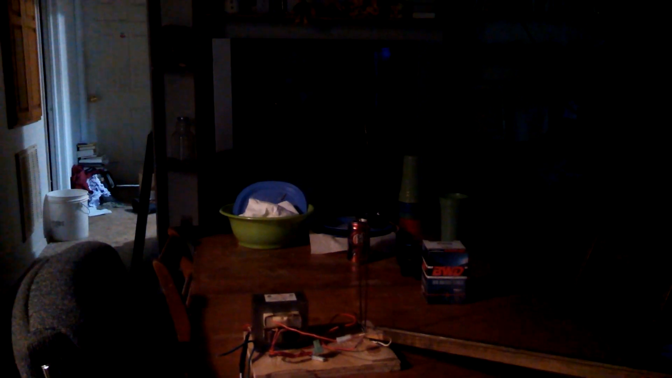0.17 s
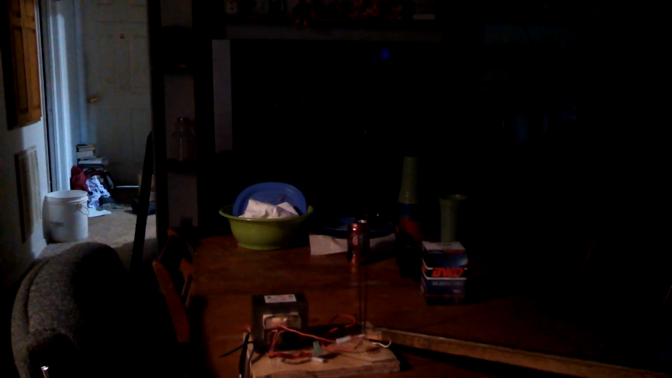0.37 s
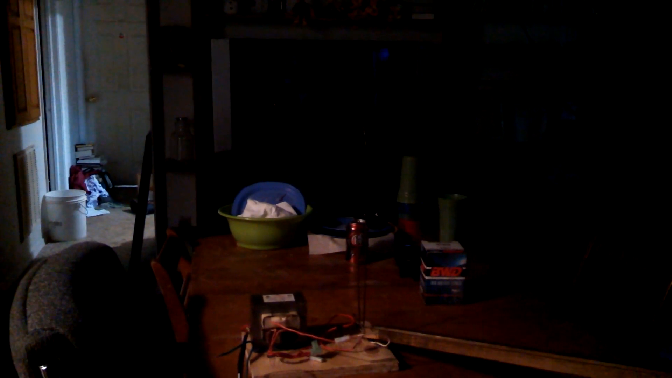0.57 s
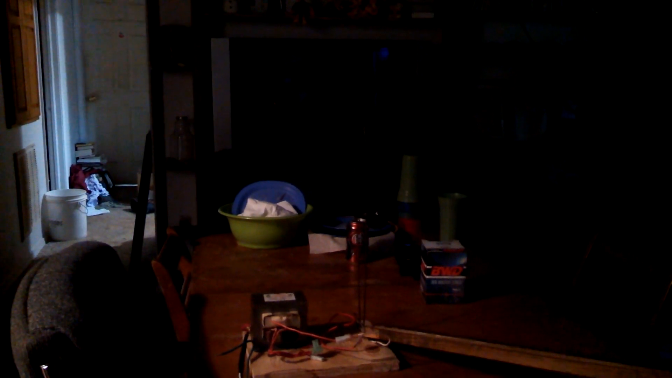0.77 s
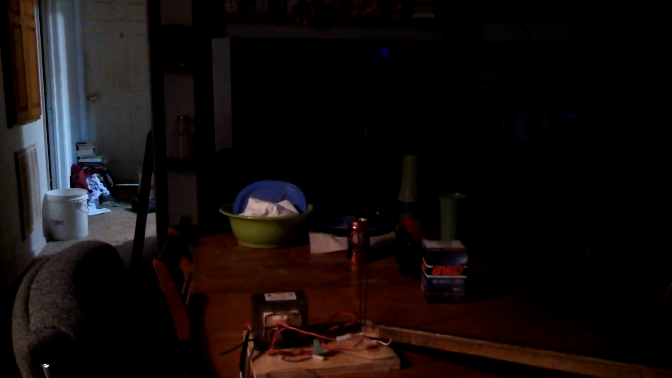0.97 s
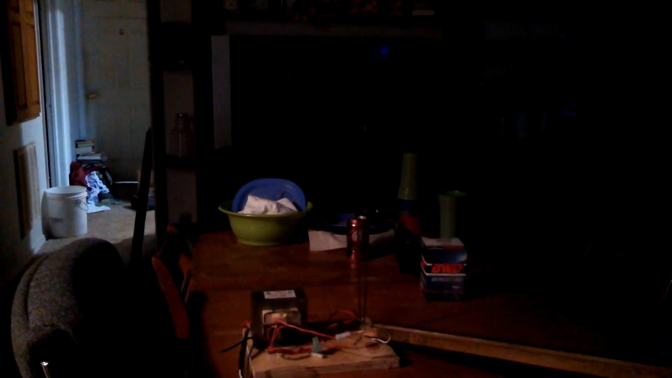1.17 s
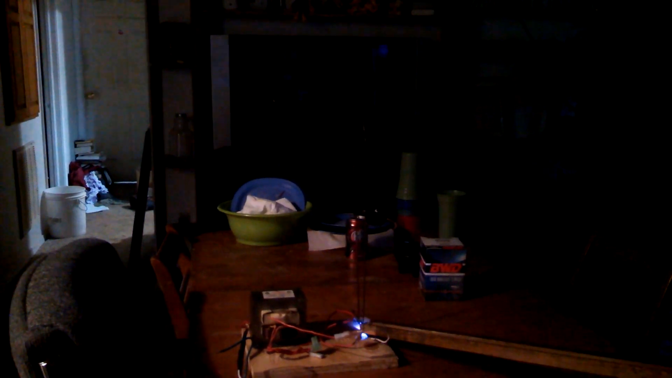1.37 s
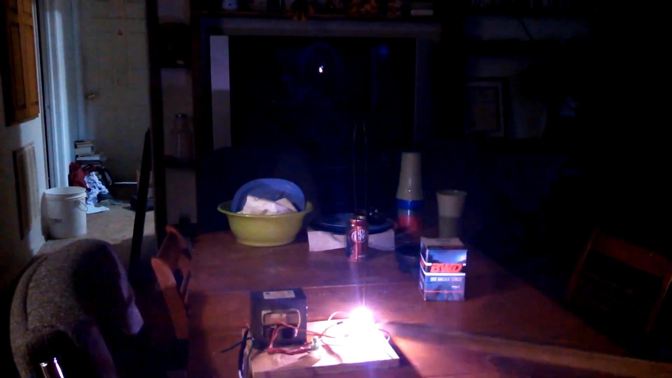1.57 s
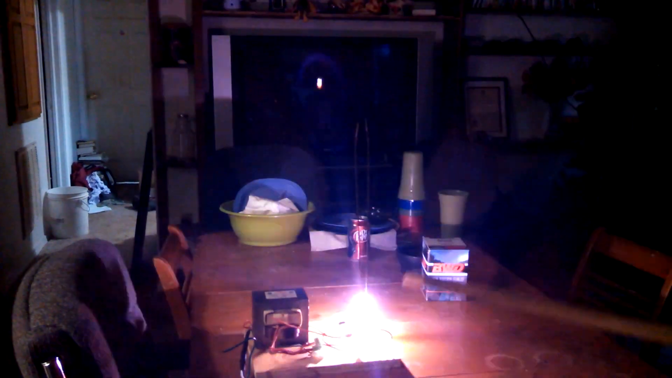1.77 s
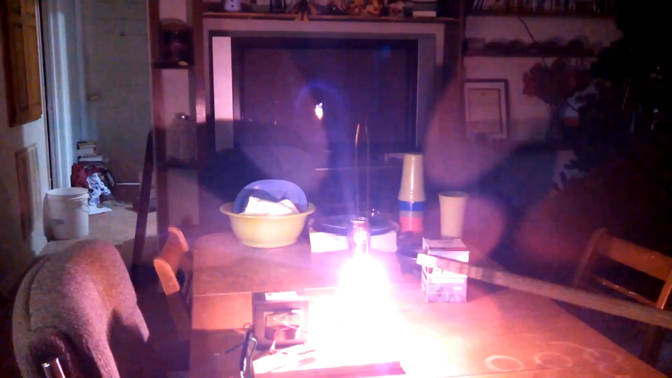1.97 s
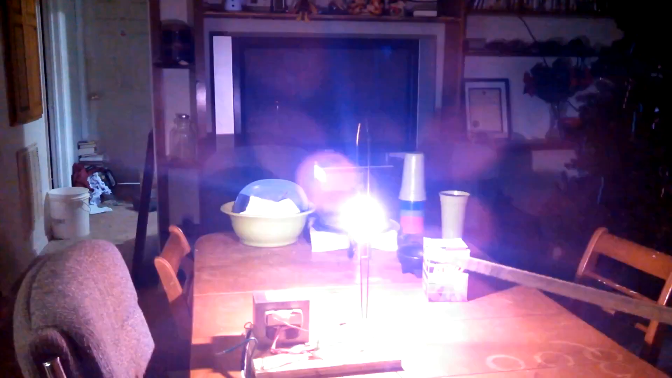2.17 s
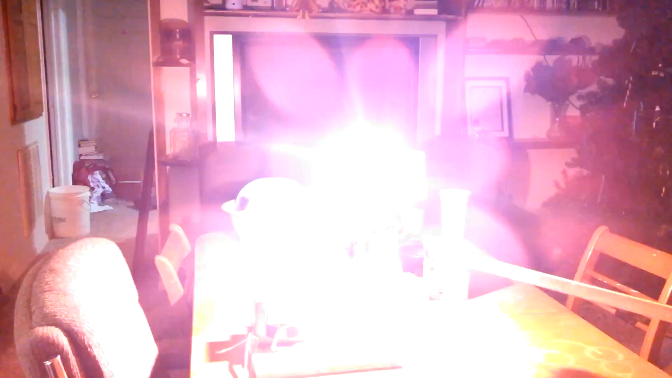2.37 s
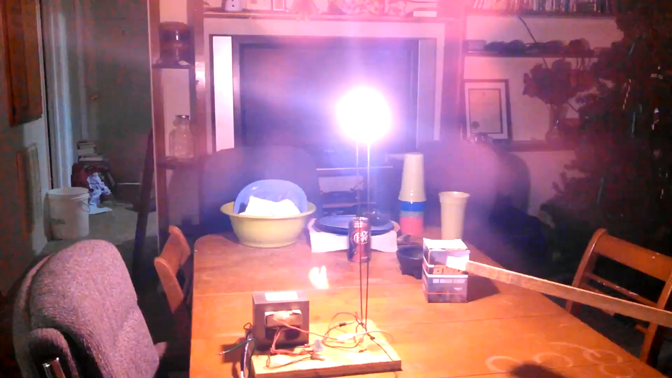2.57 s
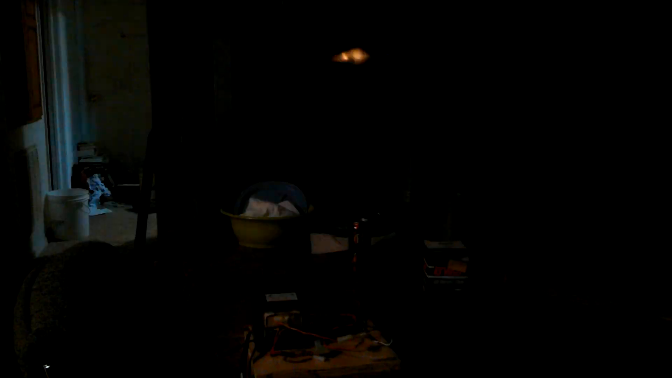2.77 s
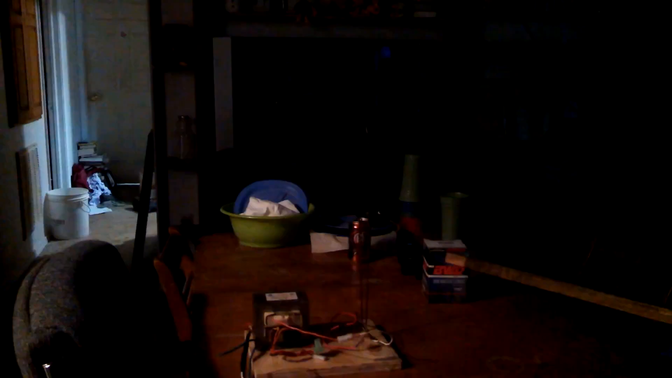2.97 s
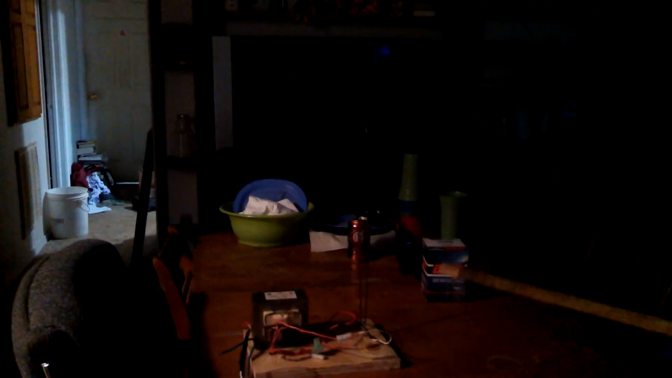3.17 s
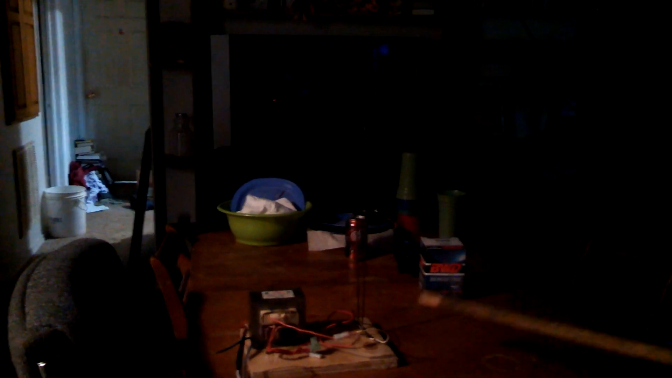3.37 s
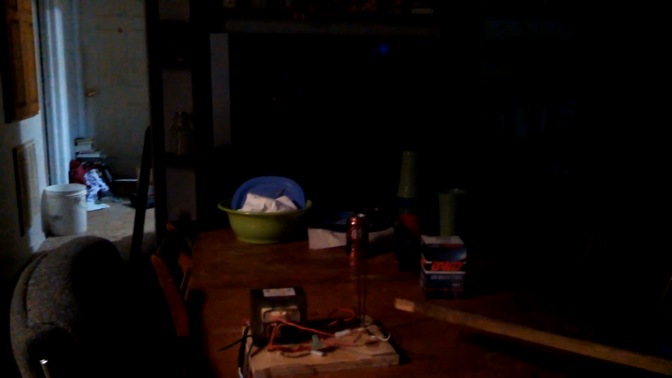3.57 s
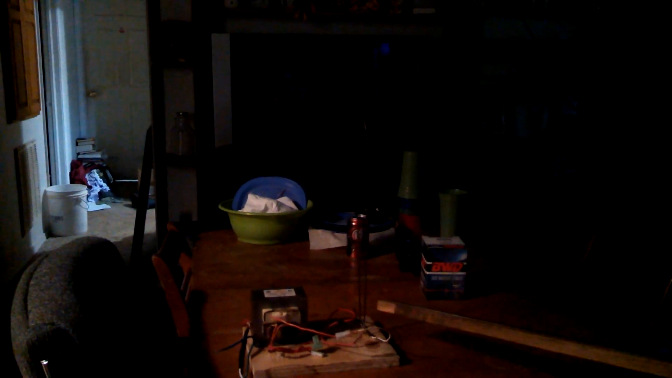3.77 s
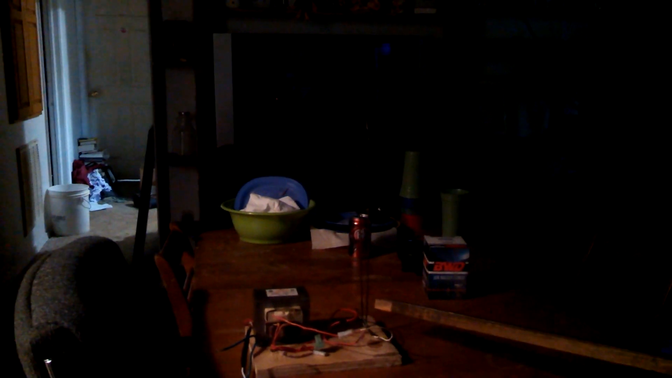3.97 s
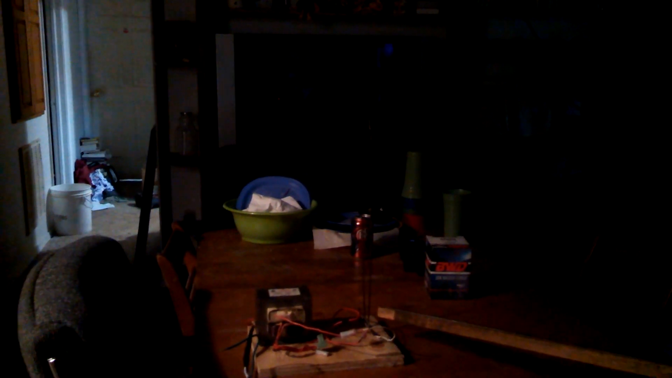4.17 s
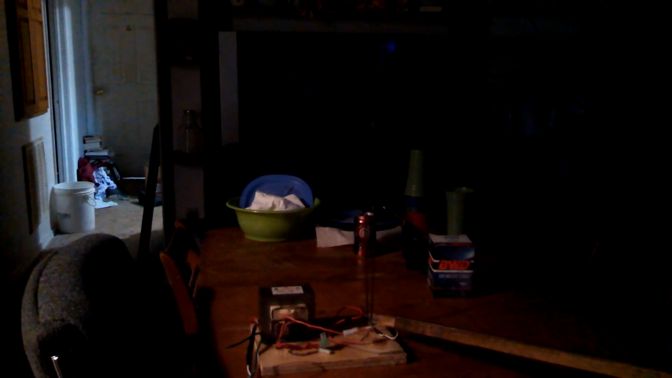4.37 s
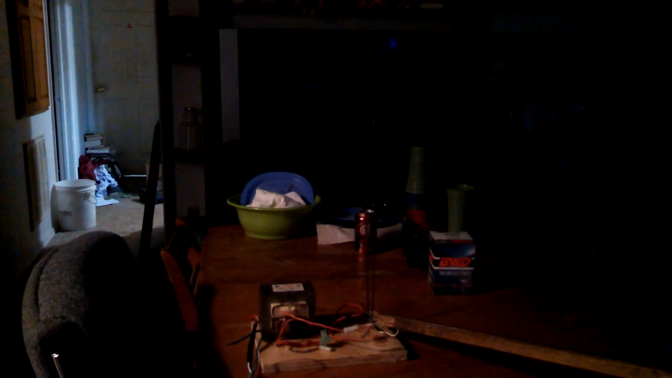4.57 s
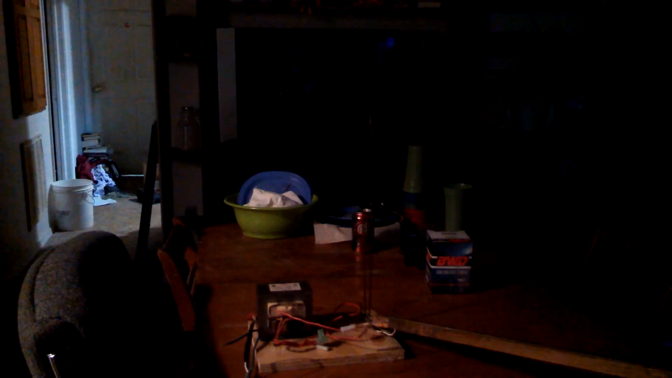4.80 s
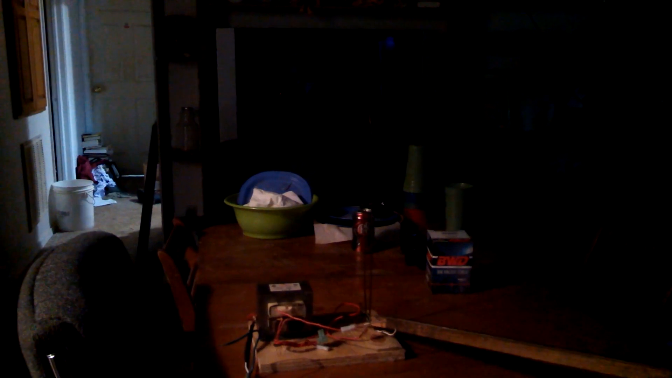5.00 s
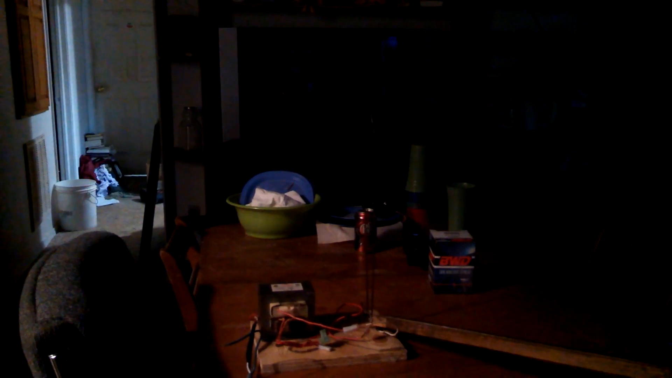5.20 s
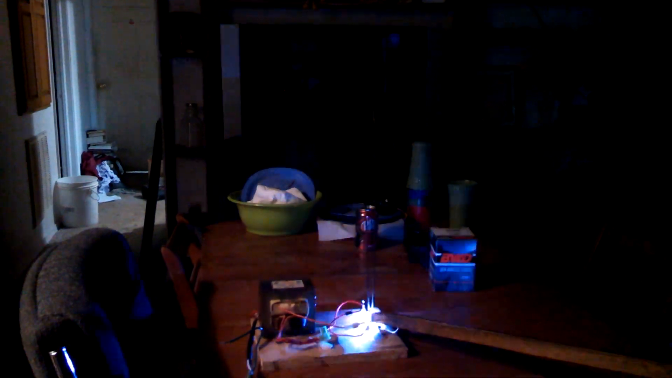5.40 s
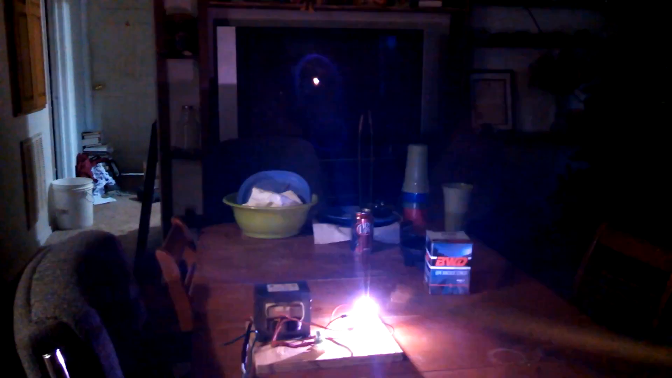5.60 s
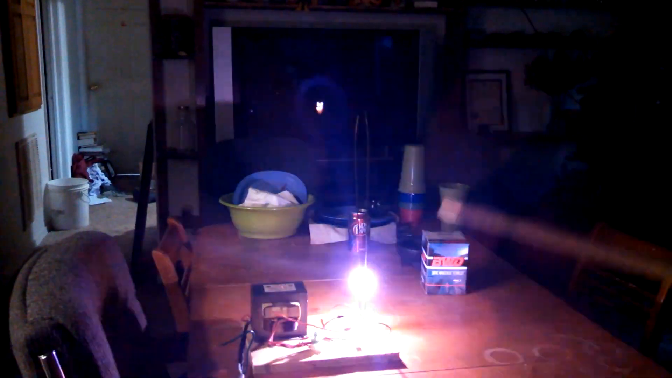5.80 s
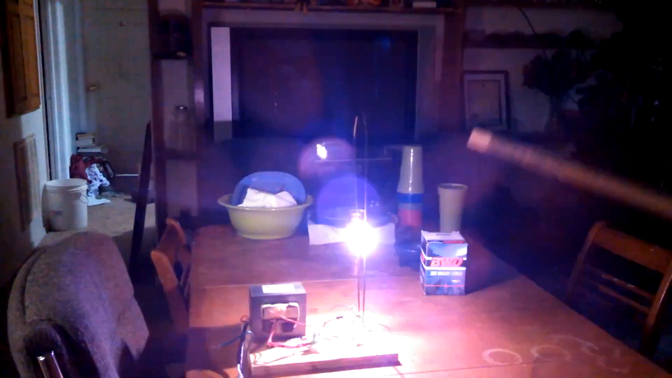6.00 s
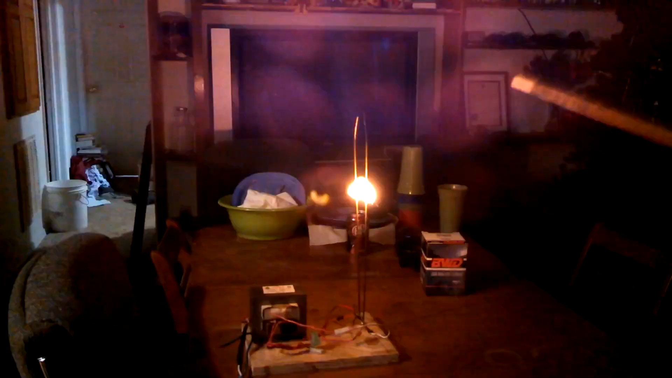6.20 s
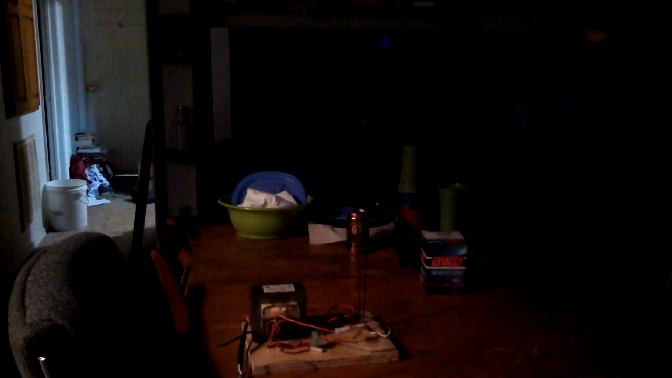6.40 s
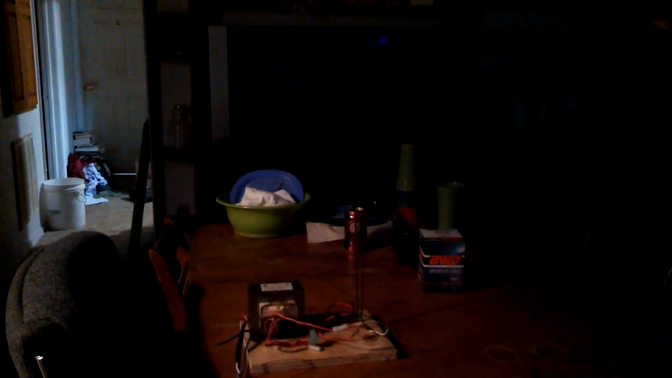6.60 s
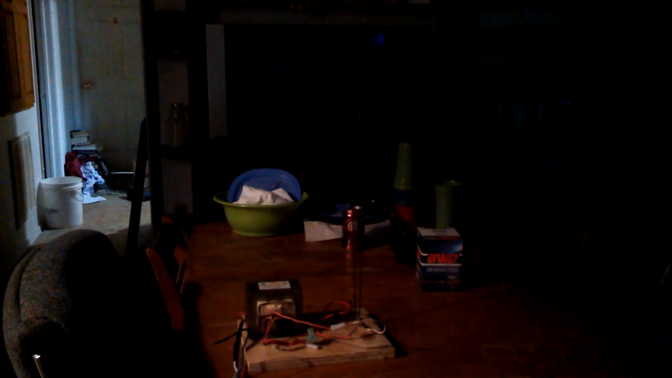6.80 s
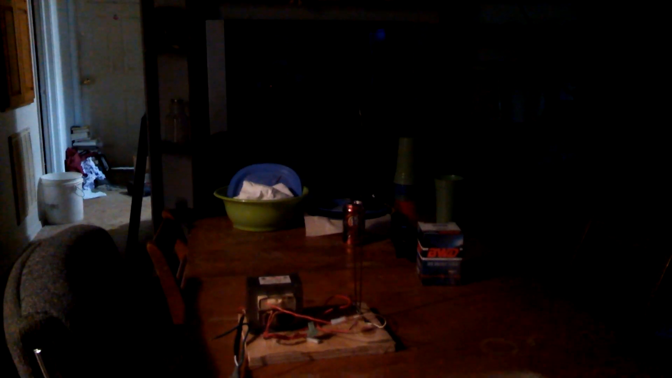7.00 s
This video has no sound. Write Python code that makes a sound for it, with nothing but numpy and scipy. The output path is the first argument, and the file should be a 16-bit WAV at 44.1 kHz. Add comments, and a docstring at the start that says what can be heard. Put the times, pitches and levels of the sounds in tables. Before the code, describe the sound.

A transformer hums low on a wooden table in a living room. A stick knocks lightly, and an electric arc starts, buzzing and crackling up two wires for over a second before it breaks. The hum returns with a few small taps. Another touch rings the wires and starts a second, shorter arc, cut off by a sharp switch snap. Faint room noise remains. The sound is wide stereo with a short echo.

```python
"""In a living room, a transformer hums on a wooden table. Twice a stick starts an electric arc that
climbs two wires, crackling as it strikes again every half cycle of the mains, until a switch snaps
the power off. Touches knock the table and ring the wires; faint squeaks, two pings and household
noise lie behind. The walls echo the sharp sounds. Two microphones hear it all, and taking a slightly
delayed share of each from the other widens the sound."""
import sys
import numpy as np
from scipy import signal
from scipy.fft import rfft, irfft, next_fast_len
from scipy.io import wavfile
from scipy.ndimage import uniform_filter1d, map_coordinates

SR = 44100
rng = np.random.default_rng(int(sys.argv[2]) if len(sys.argv) > 2 else 0)


def output_pcm(signal):
    """Save a mono or channel-first signal as 16-bit PCM at the path in sys.argv[1].

    Samples are clipped to [-1, 1] before scaling.
    """
    pcm = np.clip(np.atleast_2d(signal).T, -1, 1) * 32767
    wavfile.write(sys.argv[1], SR, np.round(pcm).astype(np.int16))


N = 310905
T = np.arange(N) / SR
BUZZ_HZ = 120  # twice the mains frequency

# The arc's way up the wires, one list per climb: (time [s], height [0-1])
CLIMBS = [
    [(1.38, 0.07), (2.79, 0.91)],
    [(5.365, 0.06), (6.266, 0.69)],
]
# When the arc strikes regularly: (start [s], end [s])
BURN_SPANS = [(1.56, 2.782), (5.42, 6.27)]


def arc():
    """A spark jumps the gap each half cycle, making a push of air and a burst of hiss of uneven size."""
    # Loudness, one list per climb: (time [s], level [dB])
    loudness = [
        [(1.378, -46.5), (1.387, -44), (1.47, -50.5), (1.545, -49.5), (1.573, -35), (1.8, -32), (2.0, -34),
         (2.2, -36), (2.36, -33.5), (2.523, -33.5), (2.613, -42.5), (2.66, -35.5), (2.695, -37), (2.74, -37.5),
         (2.775, -33.5), (2.787, -49.5), (2.84, -49.5)],
        [(5.422, -43.5), (5.494, -34.5), (5.518, -37.5), (5.714, -33.5), (5.74, -31.5), (5.9, -34),
         (6.08, -34.5), (6.2, -39), (6.27, -29.5)],
    ]
    # A longer arc strikes later in the half cycle: (time [s], shift of the strike [s])
    strike_shift = [(1.55, -.0024), (2.2, -.0014), (2.45, -.0007), (2.78, -.0015), (5.42, -.0016),
                    (5.8, -.0005), (6.27, .0003)]
    # A longer arc wanders: (height [0-1], noise share [0-1], timing scatter [s], size scatter [dB])
    roughness = [(0, .3, .00004, 1), (.15, .22, .00003, .8), (.45, .28, .00004, 1.1),
                 (.58, .45, .0001, 2.2), (.9, .62, .00025, 3.5)]
    # The loudest strikes; each layer follows its size more or less strongly:
    # (time [s], thud and knock size [dB], ring size [dB], crack and sizzle size [dB])
    crackles = [(1.5667, 2, 6, 3.5), (1.599, 10, 2.5, 8), (1.657, 2, 5, -2.5), (1.774, -6, 6, 7),
                (1.8075, -11, 7, 6.5), (1.824, -2, 6.5, -1), (1.841, 7, 6.5, 3.5), (1.892, -2, 9, -2.5),
                (1.951, 3, 7.5, -3), (2.046, 5, 10, 0.5), (2.125, 10, -2, 6), (2.1334, 10, -8.5, 11.5),
                (2.15, 5, -0.5, 8.5), (2.1665, 1, 4, 3), (2.1917, 11, 14.5, 11.5), (2.2, 15, 11.5, 13),
                (2.2337, 13, 8.5, 10.5), (2.284, 9, 10.5, 7.5), (2.3176, 8, 11, 8), (2.509, 9, 13.5, 4),
                (2.5175, 12, 4.5, 0), (2.693, 13.5, 4, 12), (2.724, 10, 4, 7), (2.768, -5, 5, 8.5),
                (5.441, 8, 11, 10.5), (5.458, 5, 9.5, -0.5), (5.4665, 4.5, -8, 5), (5.533, 6.5, 2, 9.5),
                (5.541, -3.5, 9.5, 9.5), (5.558, 5, 4, 3.5), (5.575, 0, -2, 3.5), (5.5916, 2, 9.5, 2),
                (5.608, 2, 5, 3), (5.642, 3.5, 7.5, 0.5), (5.7255, -1.5, 3, 2.5), (5.7417, -2.5, 8, 2.5),
                (5.75, 1.5, 5.5, 6.5), (5.809, 9.5, 11, 3.5), (5.8424, 3, 10.5, 5.5), (5.9014, 6, 9.5, 4.5),
                (6.1014, 5.5, 12, 13.5), (6.126, -1, 9, -8), (6.1597, 7, 14, 16), (6.2018, 16.5, 20, 16)]
    # The arc's five layers, from low to high: (frequency [Hz], level [dB])
    thud = [(250, -25.5), (450, -7.5), (620, -1.5), (780, -1.5), (1100, -24.5), (3000, -63)]
    knock = [(450, -36), (800, -2), (1000, 5.5), (1200, 0), (1600, -8), (4000, -72)]
    ring = [(800, -32), (1250, -10), (1400, -3), (1650, -3.5), (1850, -10), (2300, -23), (5000, -72)]
    crack = [(1200, -36), (1850, -4), (2200, -1.5), (2900, -6.5), (3800, -18.5), (6000, -84)]
    sizzle = [(1800, -44), (3000, 9), (4200, 6), (6200, -1), (7500, -3), (9500, -2), (12000, -8.5),
              (15000, -10)]
    # A longer arc sounds deeper: (height [0-1], thud [dB], knock [dB], ring [dB], crack [dB], sizzle [dB])
    balance = [(0, -17, -28, -10, -14, -5.5), (0.121, -11.5, -19, -3.5, -2.5, -1),
               (.2, -16.5, -11.5, 0, 3.5, -3.5), (0.292, -10, -4.5, 0.5, -3.5, -4),
               (.36, -6.5, -7.5, -2.5, -4, -4), (0.429, -1.5, -11, -4, -1.5, -1.5),
               (.51, -4, -12, -5, 0, -2), (0.579, -2.5, -8.5, -3.5, -1, -4), (.7, -9.5, -3, -5.5, -5, -6),
               (0.801, -8, -6, -10, -1.5, -2.5), (1, -1.5, -0.5, -12, -21, -29)]
    # (colour, share of the thud's lag, size group, weight of that size,
    #  strength of the clean pulse, how fast it gives way to noise, how deeply the hiss pulses)
    layers = [(thud, 1, 0, .4, 1, .7, .21),
              (knock, .5, 0, .9, 1, 1, .27),
              (ring, 0, 1, 1.1, 1, 1, .31),
              (crack, 0, 2, 1.3, .95, 1.15, .42),
              (sizzle, 0, 2, .8, .62, 0, .45)]
    beat = np.arange(int(N / SR * BUZZ_HZ))
    beat_s, beat_sample = beat / BUZZ_HZ, beat * SR // BUZZ_HZ
    chance = rng.standard_normal((len(beat), 7))
    noisy, scatter_s, scatter_db = by_height(roughness)
    times = beat_s + np.interp(beat_s, *np.transpose(strike_shift))
    times += scatter_s[beat_sample] * chance[:, 1]
    # The current flows each way in turn, and the two ways strike unequally.
    size_db = np.tile(1.2 * chance[:, 0] - 1.2 * (-1.) ** beat, (3, 1))
    scatter_db = scatter_db[beat_sample]
    for time, *sizes in crackles:
        nearest = np.argmin(np.abs(times + .0015 - time))  # the peak comes just after the strike
        size_db[:, nearest], scatter_db[nearest] = sizes, 1
    height = np.interp(times, *np.vstack(CLIMBS).T)
    thud_lag_s = np.interp(height, [0, 1], [-.0024, .001])  # leads a short arc's crack, trails a long one's
    striking, burning = inside(BURN_SPANS, times), inside(BURN_SPANS, T)
    unit_burn = lambda x: x / np.sqrt(np.mean(x[burning] ** 2))
    sound = np.zeros(N)
    for k, level_db in enumerate(by_height(balance)):
        colour, lag_share, group, weight, clean, frailty, depth = layers[k]
        kick_at = np.round((times + lag_share * thud_lag_s)[striking] * SR).astype(int)
        kick_db = weight * size_db[group] + scatter_db * chance[:, 2 + k]
        kicks = np.zeros(N)
        kicks[kick_at] = -amp(kick_db[striking])
        flashes = signal.lfilter([1], [1, -np.exp(-1 / (.0018 * SR))], np.abs(kicks))  # flare, then fade
        flashes = uniform_filter1d(flashes, SR // 700)
        flicker = amp(4.04 * wobble(90)) * (1 - depth + depth * np.where(burning, unit_burn(flashes), 1))
        hiss = unit_burn(coloured(flicker * rng.standard_normal(N), colour))
        pulses = unit_burn(coloured(kicks, colour))
        pulse_share = clean * np.sqrt(1 - (frailty * noisy) ** 2)
        hiss_share = np.where(burning, np.sqrt(1 - pulse_share ** 2), 1)
        sound += amp(level_db + .6 * wobble(14)) * (pulse_share * pulses + hiss_share * hiss)
    lit = inside([(rows[0][0], rows[-1][0]) for rows in loudness], T)
    return amp(curves(np.vstack(loudness))[0]) * lit * sound


def spits():
    """The arc spits single short sparks, some hissy and some bright."""
    # The sparks: (time [s], hissy part [dB], bright part [dB], time to fade 60 dB [s])
    sparks = [(1.385, -47, -38.5, 0.013), (1.399, -47, -31, 0.011), (1.489, -24, -37, 0.1),
              (1.523, -37, -36.5, 0.038), (1.551, -28, -45, .012), (1.556, -34, -49, .012),
              (1.568, -20, -22, 0.029), (1.782, -39, -43, 0.0097), (2.03, -21, -42, 0.021),
              (2.038, -28, -52, 0.012), (2.179, -35, -30, 0.016), (2.3491, -36, -21, .012),
              (2.77, -31, -30, 0.012), (5.427, -39, -31, .015), (5.429, -40, -44.5, 0.01),
              (5.445, -38, -33.5, .01), (5.459, -34, -32.5, .012), (5.52, -14, -23, 0.022),
              (5.722, -32, -38.5, 0.013), (5.78, -34, -37.5, 0.013), (5.884, -37, -22, 0.01),
              (5.97, -25.5, -41, .015), (6.027, -24.5, -41.5, 0.015)]
    # Colours of the two parts: (frequency [Hz], level [dB])
    hissy_colour = [(1000, -33), (2500, -1.5), (4300, -3), (6000, -4.5), (9000, -21.5), (15000, -37.5)]
    bright_colour = [(1500, -29.5), (4000, -8.5), (7200, 4), (9500, 3.5), (15000, -11)]
    hissy, bright = sum(amp([[hiss_db], [bright_db]] - 60 * np.clip(T - time, 0, 1) / fade_s) * (T > time)
                        for time, hiss_db, bright_db, fade_s in sparks)
    noise = rng.standard_normal(N)
    return coloured(hissy * noise, hissy_colour) + coloured(bright * noise, bright_colour)


def transformer():
    """The iron core buzzes at multiples of BUZZ_HZ; a burning arc unsteadies it and adds a low roar."""
    # The buzz with no arc, at its 2nd harmonic (2 x BUZZ_HZ): (time [s], level [dB])
    idle = [(0, -41.5), (.6, -43), (1.34, -42), (2.92, -41), (4.1, -41.5), (4.25, -44), (4.7, -41.5),
            (5.3, -41)]
    # The buzz sags as the arc shorts the core, then swells as the arc lengthens:
    # (height [0-1], 1st harmonic [dB], 2nd [dB], 3rd [dB], 4th [dB])
    under_load = [(0, -60, -16, -72, -75), (0.081, -59, -64.5, -88, -77), (0.152, -70, -47, -54, -72),
                  (.3, -56, -47.5, -50.5, -72), (.38, -58, -48, -45, -70), (.6, -53.5, -40, -39, -63.5),
                  (.75, -47, -35.5, -40, -61), (.8, -48, -33.5, -49, -45), (.83, -39, -34, -44, -39),
                  (.85, -43, -29.5, -37, -38), (.88, -35.5, -32.5, -38, -41), (.905, -37.5, -34, -31, -37)]
    # Higher harmonics that ignore the arc: (multiple of BUZZ_HZ, level [dB])
    overtones = [(5, -64.5), (6, -64), (8, -69), (10, -68), (11, -75.5)]
    # The flame's roar: (frequency [Hz], level [dB])
    roar_colour = [(60, -48.5), (110, -21), (160, -12), (300, -11), (450, -6.5), (700, -30.5)]
    # The 3rd harmonic falls behind the 2nd, the 4th twice as far: (height [0-1], lag [cycles])
    slipping = [(0, 0), (.3, 0), (.85, .75), (1, .75)]
    idle_offsets_db, swells_db = (-28.5, -0.5, -12.5, -34), (5.5, 7, 4.7, 4)  # 1st to 4th harmonic
    power_off_s, swell_s, settle_s = 6.271, 0.09, 0.015
    load_spans = [(CLIMBS[0][0][0], BURN_SPANS[0][1]), (CLIMBS[1][0][0], T[-1])]
    loaded = uniform_filter1d(1. * inside(load_spans, T), int(settle_s * SR))
    burning = uniform_filter1d(1. * inside(BURN_SPANS, T), SR // 20)
    swell = np.clip(1 - (power_off_s - T) / swell_s, 0, 1) ** .5  # just before the power goes
    levels = [loaded * load_db + (1 - loaded) * (curves(idle)[0] + offset_db) + swell * swell_db
              for load_db, offset_db, swell_db in zip(by_height(under_load), idle_offsets_db, swells_db)]
    slip = loaded * by_height(slipping)[0]
    shake_db, waver = 0.2 + 1.1 * burning, 0.064 + 0.35 * burning
    low = sum(amp(db + shake_db * wobble(25)) * tone((k + 1) * BUZZ_HZ, waver, 0.47 - max(k - 1, 0) * slip)
              for k, db in enumerate(levels))
    high = sum(amp(db + 2 * wobble(22)) * tone(k * BUZZ_HZ, waver=0.12) for k, db in overtones)
    roar = burning * amp(levels[1] - 5.5) * steady_noise(roar_colour)
    return (low + high + roar) * np.clip((power_off_s - T) / 0.0032, 0, 1)


def touches():
    """Each touch of the stick or the switch ticks, shakes the table top and rings the wires."""
    # The touches; a fade is the time to drop 20 dB:
    # (time [s], tick [dB], tick fade [s], knock [dB], wire ring [dB], knock fade [s])
    contacts = [(0.613, -61, 0.022, -26, -85, 0.083), (1.382, -50, 0.028, -17, -84, 0.05),
                (1.412, -64, .025, -19, -60, 0.044), (1.433, -55, 0.052, -24.5, -60, 0.082),
                (1.451, -68, .013, -23, -94, 0.075), (1.597, -54, .025, -13.5, -53, 0.06),
                (4.757, -52, .002, -16.5, -95, 0.0032), (4.765, -65, 0.0052, -14, -94, 0.011),
                (4.796, -83, .05, -34, -98, 0.16), (4.892, -80, .009, -20, -95, 0.018),
                (4.928, -80, .012, -32, -95, 0.024), (5.36, -44.5, 0.0087, -19, -45, 0.03),
                (5.3754, -27, 0.0027, -12, -37, 0.033), (5.402, -69, .03, -19.5, -47, 0.11),
                (6.337, -60, 0.015, -32.5, -83, 0.04), (6.393, -52.5, 0.072, -13.5, -87, 0.099),
                (6.426, -47, 0.088, -35.5, -78, 0.2)]
    # Notes of the free wires: (frequency [Hz], level [dB], time to fade 60 dB [s])
    wire_notes = [(1215, 2, .6), (1690, -1, .08), (2086, -2, .45), (3220, -7, .3), (3800, -6, .1),
                  (4517, -9, .3), (5200, -8, .25)]
    # Notes of the wooden top: (frequency [Hz], width [Hz], level [dB])
    wood_notes = [(136, 28, 1.5), (218, 160, 1), (380, 79, 5), (500, 47, 1.5), (688, 54, 2),
                  (1130, 500, -6.5)]
    # The tick: (frequency [Hz], level [dB])
    tick_colour = [(600, -23), (1400, 19.5), (2400, 21.5), (4300, 11), (7000, 3.0), (14000, -3.5)]
    ticks, shakes, rings = np.zeros((3, N + SR))
    t = T[:SR // 2]
    ring = ringing(wire_notes, t)
    for time, tick_db, tick_s, knock_db, ring_db, knock_s in contacts:
        at = slice(round(time * SR), round(time * SR) + len(t))
        ticks[at] += amp(tick_db - 20 * t / tick_s) * rng.standard_normal(len(t))
        shakes[at] += amp(knock_db - 20 * t / knock_s) * rng.standard_normal(len(t))
        rings[at] += amp(ring_db - 20 * t / (6 * knock_s)) * ring  # the stick damps the wires

    def wood(hz):
        notes = sum((-1) ** k * amp(db) * 1j * hz * width / (centre ** 2 - hz ** 2 + 1j * hz * width)
                    for k, (centre, width, db) in enumerate(wood_notes))
        return notes / (1 + 1j * hz / 1300) ** 2  # a soft touch makes little treble

    return coloured(ticks[:N], tick_colour) + filtered(shakes[:N], wood) + rings[:N]


def switch():
    """The switch gives a dry, bright snap with a faint scrape just before it."""
    # The snap: (frequency [Hz], level [dB])
    snap_colour = [(800, -18), (1600, 11.5), (4000, 2), (7200, 15.5), (9500, 9), (12500, 2), (15500, 13.5)]
    age = T - 6.2692
    snap = amp(-60 * np.abs(age) / 0.009)
    scrape = amp(-24 - 60 * np.abs(age) / 0.3) * (age > -.008)
    return amp(-16) * coloured(np.where(age > 0, snap, scrape) * rng.standard_normal(N), snap_colour)


def pings():
    """Something small clicks twice and leaves a thin ring."""
    # The two hits: (time [s], click [dB], ring [dB])
    hits = [(4.4468, -26.5, -54), (4.4568, -60, -48)]
    # The ring: (frequency [Hz], level [dB], time to fade 60 dB [s])
    notes = [(4030, -3, .05), (4330, 0, 0.062), (4460, -3, .06)]
    # The click: (frequency [Hz], level [dB])
    click_colour = [(700, -15), (1500, 4), (4000, 0), (7500, -4.5), (10000, -8), (15000, -16)]
    clicks, rings = np.zeros((2, N))
    t = T[:SR // 5]
    for time, click_db, ring_db in hits:
        at = slice(round(time * SR), round(time * SR) + len(t))
        clicks[at] += amp(click_db - 60 * t / .008) * rng.standard_normal(len(t))
        rings[at] += amp(ring_db) * ringing(notes, t)
    return coloured(clicks, click_colour) + rings


def squeaks():
    """A wavering tone swells briefly into faint squeaks."""
    # The squeaks: (time [s], level [dB], length [s])
    peaks = [(0.612, -52, 0.021), (0.843, -43, 0.03), (1.049, -51, 0.02)]
    swell = sum(amp(db) * np.exp(-((T - time) / (length / 2)) ** 2) for time, db, length in peaks)
    return swell * tone(1405, waver=.3)


def wall_echo(x):
    """The walls answer x, each pitch dying at its own speed; the echo is drawn anew every half second."""
    # How long the walls ring: (frequency [Hz], time to fade 60 dB [s])
    fade_times = [(150, 0.026), (1000, 0.19), (5000, 0.34), (12000, 0.015)]
    # How strongly they answer: (frequency [Hz], level [dB])
    echo_colour = [(600, -9), (1500, -7), (4000, -6.5), (12000, 0)]
    echo = np.zeros((2, N + 2 * SR))
    step, delay = SR // 2, 200  # samples
    for start in range(0, N, step):
        hz, t, noise = signal.stft(rng.standard_normal((2, SR // 2)), SR, nperseg=256)
        fade = amp(-60 * t / along(fade_times, hz)[:, None])
        tail = signal.istft(noise * fade, SR, nperseg=256)[1]
        piece = signal.fftconvolve(x[None, start:start + step], tail / np.linalg.norm(tail[0]), axes=1)
        echo[:, start + delay:start + delay + piece.shape[1]] += piece
    return filtered(spread(*echo[:, :N]), lambda hz: amp(along(echo_colour, hz)))


def household():
    """The house adds hush, rumble, wavering tones and a low hum that comes and goes."""
    # Loudness of the noise: (time [s], hush [dB], rumble [dB])
    noise_levels = [(0, -50.5, -61), (.4, -53.5, -64.5), (1.3, -50, -60), (2.9, -52, -57), (3.3, -49, -64),
                    (4.1, -52.5, -61), (5.3, -52, -59), (6.3, -46, -59.5), (7.05, -53, -63.5)]
    # Colours of the two noises, then the single tones: (frequency [Hz], level [dB])
    hush_colour = [(80, -46.5), (130, 5), (180, 4), (300, 6.5), (500, 3.5), (800, 0.5), (1300, -5.5),
                   (2400, -6), (3600, -12.5), (4700, -9), (6200, -15), (12000, -25), (16000, -23)]
    rumble_colour = [(20, -41.5), (40, -11.5), (70, -4), (97, -1), (140, -7.5), (200, -35)]
    house_tones = [(207, -66), (409, -70.5), (468, -66), (592, -67.5), (710.6, -61), (818, -71.5),
                   (931, -74.5), (1400, -72.5), (1464, -70), (4790, -73.5)]
    # The hum: (time [s], level [dB])
    hum_levels = [(0, -79), (3.05, -86), (3.25, -59), (3.9, -65), (4.0, -59.5), (5.3, -61), (5.6, -77)]
    hush_db, rumble_db = curves(noise_levels)

    def one_side():
        hush = amp(hush_db + 1.4 * wobble(6)) * steady_noise(hush_colour)
        rumble = amp(rumble_db + 1.1 * wobble(8.5)) * steady_noise(rumble_colour)
        tones = sum(amp(db + 0.91 * wobble(7.3)) * tone(hz, waver=0.65) for hz, db in house_tones)
        return hush + rumble + tones

    late_tone = amp(-60) * np.clip((T - 6.45) / 0.067, 0, 1) * tone(146, waver=0.77)
    hum = amp(curves(hum_levels)[0]) * tone(97.8, waver=0.65)
    return (late_tone + hum + spread(one_side(), one_side())) * amp([[-.3], [.3]])


def amp(db):
    """Turn decibels into a factor to multiply by."""
    return 10 ** (np.asarray(db) / 20)


def along(points, hz):
    """Read (frequency [Hz], value) points at hz, with octaves evenly spaced."""
    freqs, values = np.transpose(points)
    return np.interp(np.log(hz + 1), np.log(freqs + 1), values)


def curves(rows):
    """One value per sample for each column after the time."""
    times, *columns = np.transpose(rows)
    return [np.interp(T, times, column) for column in columns]


def by_height(rows):
    """One value per sample for each column after the height, following the arc's climb."""
    heights, *columns = np.transpose(rows)
    return [np.interp(curves(np.vstack(CLIMBS))[0], heights, column) for column in columns]


def inside(spans, t):
    """True where t lies in one of the spans."""
    return sum((t > start) & (t < end) for start, end in spans) > 0


def wobble(rate):
    """A smooth curve through `rate` random values a second."""
    return map_coordinates(rng.standard_normal(int(N * rate / SR) + 4), [T * rate])


def tone(hz, waver, start=None):
    """A tone of power 1, `start` cycles ahead, whose phase wanders by about `waver` radians."""
    start = rng.random() if start is None else start
    return np.sqrt(2) * np.cos(2 * np.pi * (hz * T + start) + waver * wobble(12))


def ringing(notes, t):
    """The fading notes of something struck."""
    return sum(amp(db - 60 * t / fade_s) * np.sin(2 * np.pi * hz * t) for hz, db, fade_s in notes)


def steady_noise(colour):
    """Noise of power 1 with this colour."""
    noise = filtered(rng.standard_normal(N), lambda hz: amp(along(colour, hz)))
    return noise / np.sqrt(np.mean(noise ** 2))


def filtered(x, response):
    """Scale and shift each frequency of x by response(hz)."""
    size = next_fast_len(N + SR // 2)
    return irfft(rfft(x, size) * response(np.fft.rfftfreq(size, 1 / SR)), size)[..., :N]


def coloured(x, colour):
    """Give x this colour with a filter that rings only after a hit, never before."""
    cepstrum = irfft(np.log(amp(along(colour, np.fft.rfftfreq(4096, 1 / SR)))))
    cepstrum[1:2048] *= 2  # fold the early half onto the late half
    cepstrum[2049:] = 0
    return signal.fftconvolve(x, irfft(np.exp(rfft(cepstrum))))[:N]


def spread(a, b):
    """Mix two unrelated signals into two sides: most alike near 200 Hz, wide in deep bass and treble."""
    # How well the two microphones agree: (frequency [Hz], likeness [0-1])
    likeness = [(40, 0.2), (100, 0.27), (200, 0.93), (500, 0.32), (900, 0.6), (1500, 0.24), (16000, 0.078)]
    angle = lambda hz: np.arccos(along(likeness, hz)) / 2
    same = filtered(a, lambda hz: np.cos(angle(hz)))
    opposite = filtered(b, lambda hz: np.sin(angle(hz)))
    return np.array([same + opposite, same - opposite])


def placed(x, lead_s, left):
    """x at both microphones, the left one lead_s early and louder by (frequency [Hz], level [dB])."""
    side = np.array([[.5], [-.5]])
    response = lambda hz: np.exp(2j * np.pi * hz * lead_s * side) * amp(along(left, hz) * side)
    return filtered(np.array([x, x]), response)


def scene():
    """Each source reaches the microphones at slightly different times; the walls echo the sharp ones."""
    # How much louder the arc's spot is on the left: (frequency [Hz], level [dB])
    arc_left = [(300, -1), (1200, -3.5), (2200, 1.5), (5000, -10.5), (12000, 7)]
    near = arc() + spits() + touches()
    snap = switch()
    echo = wall_echo(near + amp(-8.5) * snap)
    direct = placed(near + squeaks() + pings(), lead_s=0.00015, left=arc_left)
    direct += placed(snap, lead_s=0.000116, left=[(1000, -1.6)])
    buzz = placed(transformer(), lead_s=-0.00012, left=[(1000, 0.47)])
    return direct + echo + buzz + household()


def record(dry):
    """Each side is its microphone minus some of the delayed other one, with the lost bass lifted back."""
    # All sound drops at the snap, then creeps up: (time [s], level [dB])
    overall_level = [(0, -1.5), (6.273, 0), (6.285, -8.5), (6.55, -14.5), (7.05, -7.5)]
    # The microphones' uneven treble: (frequency [Hz], level [dB])
    mic_colour = [(7000, 1.5), (9200, -3), (10300, -10.5), (12000, -3), (15400, -1), (15800, -34.5),
                  (16600, -34.5)]
    # How much of the other microphone is taken away: (frequency [Hz], share [0-1])
    cross_share = [(200, 0.73), (1500, 0.55), (3000, 0.84), (12000, 0.65)]
    delay_s, mono_above_hz, top_hz = 16 / SR, 13600, 16650
    cross = lambda hz: along(cross_share, hz) * np.exp(-2j * np.pi * hz * delay_s)
    loss = lambda hz: np.abs(1 - cross(np.minimum(hz, 1 / (2 * delay_s))))
    lift = lambda hz: amp(along(mic_colour, hz)) * (hz < top_hz) / loss(hz)
    left, right = dry * amp(curves(overall_level)[0])
    mid = filtered(left + right, lambda hz: (1 - cross(hz)) * lift(hz)) / 2
    side = filtered(left - right, lambda hz: (1 + cross(hz)) * lift(hz) * (hz < mono_above_hz)) / 2
    return np.array([mid + side, mid - side])


dry = scene()
out = record(dry)
output_pcm(out)
```